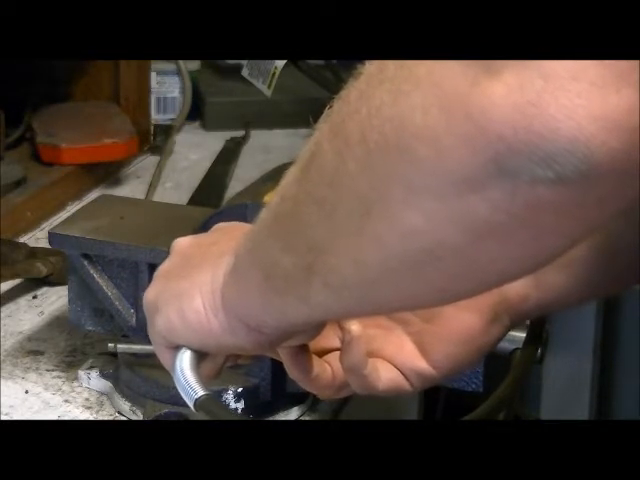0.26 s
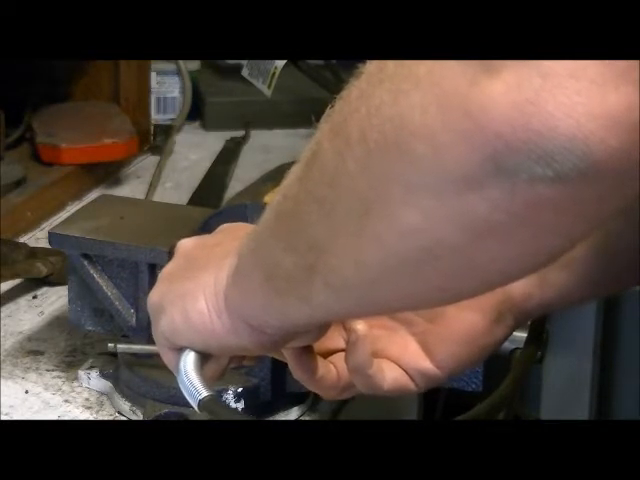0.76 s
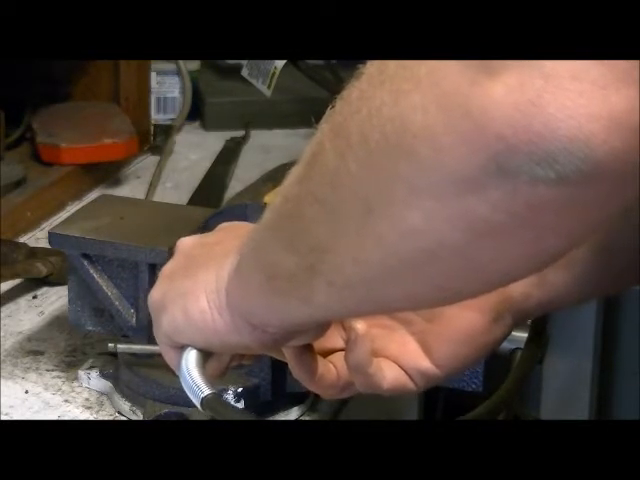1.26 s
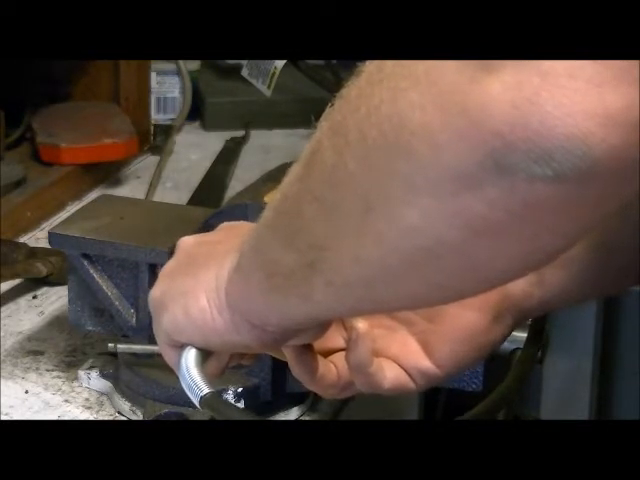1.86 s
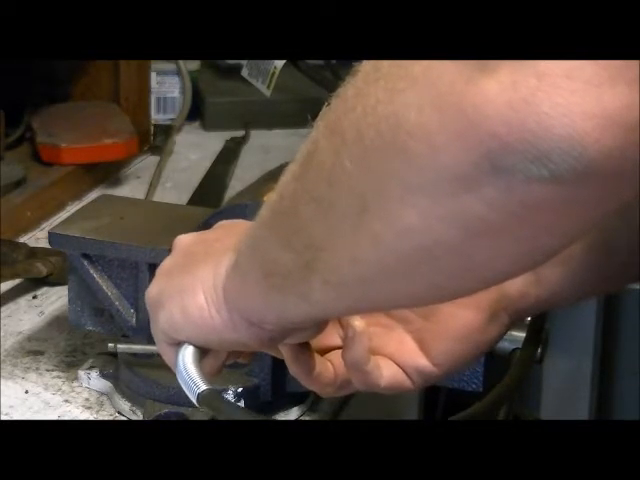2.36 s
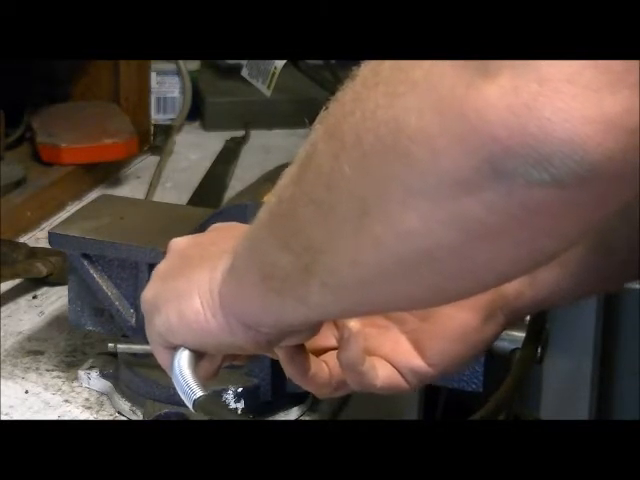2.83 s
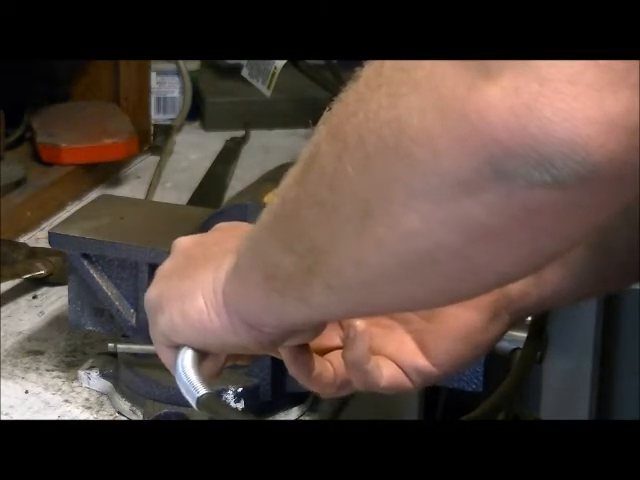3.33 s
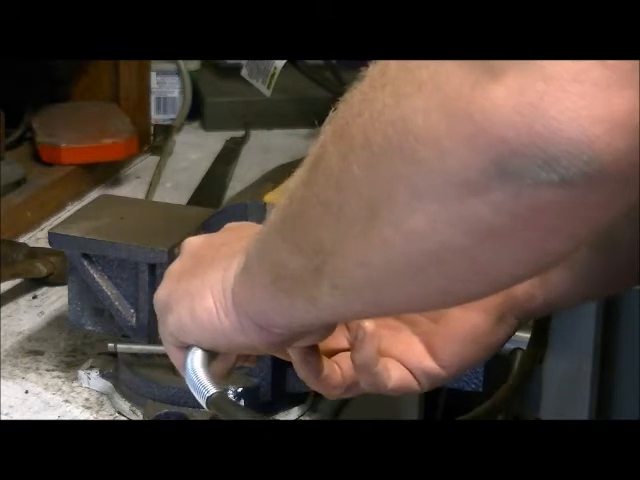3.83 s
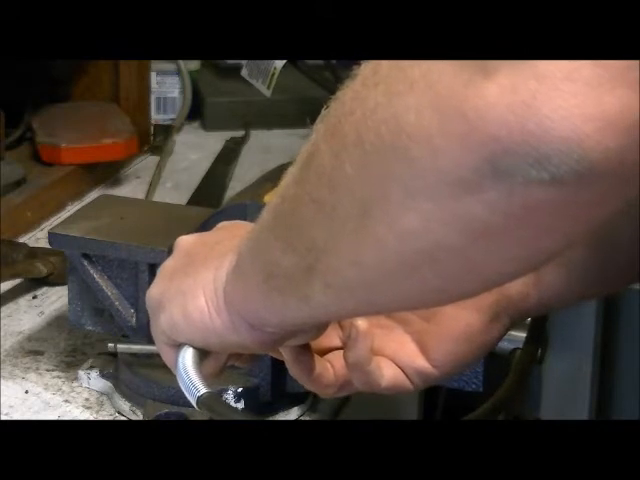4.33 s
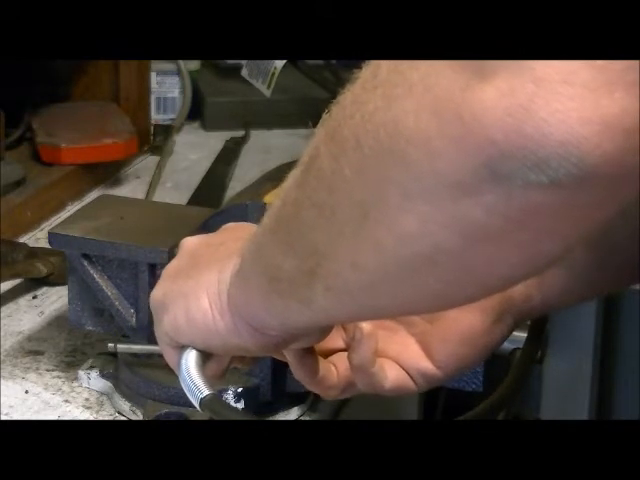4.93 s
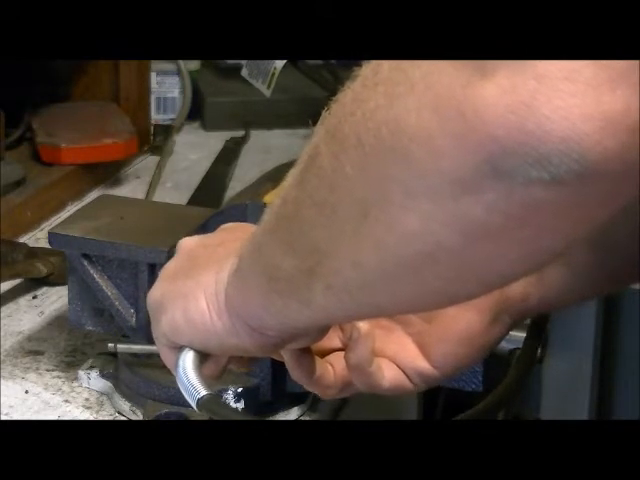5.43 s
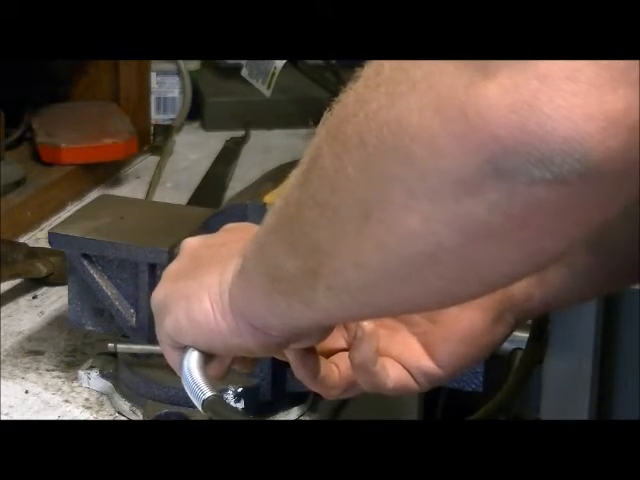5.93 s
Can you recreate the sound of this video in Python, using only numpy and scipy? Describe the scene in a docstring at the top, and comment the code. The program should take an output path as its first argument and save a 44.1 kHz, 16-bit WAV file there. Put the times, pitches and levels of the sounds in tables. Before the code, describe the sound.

Continuous close grinding of steel by a small high-speed tool, scratchy and ringing, with pitch wobbling under load, sagging late, then climbing again.

```python
"""Rotary tool grinding steel

A handheld rotary tool grinds a steel part held in a vice, in a workshop. The burr's teeth are random noise that
rattles the steel into many short rings, over a broad scratch, a low body and a hiss of sparks. At times the bounce
of the burr locks to the shaft and repeats every two or four turns, which draws a buzzing pitch out of the rasp.
The pitch follows a drawn shaft speed, slower under load. Sine waves make the shaft hum; shaped noise makes the
cooling air and a faint rumble; decaying noise adds a tail and a faint side sound for slight stereo width."""
import sys
import numpy as np
from scipy import signal
from scipy.fft import rfft, irfft, next_fast_len
from scipy.io import wavfile
from scipy.ndimage import uniform_filter1d

SR = 44100
rng = np.random.default_rng(int(sys.argv[2]) if len(sys.argv) > 2 else 0)


def wrap_up_sound(samples):
    """Save the sound to the file named by the first command line argument, as 16-bit audio."""
    columns = np.atleast_2d(samples).T
    # keep every value between -1 and 1, then stretch to whole-number steps
    tamed = np.clip(columns, -1, 1)
    steps = np.round(tamed * 32767).astype(np.int16)
    wavfile.write(sys.argv[1], SR, steps)


N = 272979  # length in samples


def from_db(db):
    """Turn decibels into gain."""
    return 10 ** (np.asarray(db) / 20)


def rms_one(x):
    """Scale a sound to an rms level of 1."""
    return x / np.sqrt(np.mean(x ** 2) + 1e-20)


def in_time(rows):
    """Draw each column after the time column as a curve with one value per sample."""
    times, *columns = np.transpose(rows)
    return [np.interp(np.arange(N) / SR, times, column) for column in columns]


def at_hz(points, hz):
    """Read a drawn spectrum, with straight lines on a log-frequency axis."""
    point_hz, point_db = np.array(points)[:, 0], np.array(points)[:, 1]
    return np.interp(np.log(hz + 1), np.log(point_hz), point_db)


def drift(rate_hz):
    """Slow random wandering of spread 1: coarse noise smoothed by two equal one-pole low-passes."""
    step = 40  # samples between coarse points
    pole = np.exp(-2 * np.pi * rate_hz * step / SR)
    noise = rng.standard_normal(N // step + 2002)
    slow = signal.lfilter([1], [1, -2 * pole, pole * pole], noise)[2000:]  # drop the filter's start-up
    return np.interp(np.arange(N) / step, np.arange(len(slow)), rms_one(slow))


def resonance(x, hz, width):
    """A two-pole band that rings at one pitch, with gain 1 at its peak; a narrower band rings longer."""
    r = np.exp(-np.pi * width / SR)
    feed = np.array([1, 0, -1]) * (1 - r * r) / 2
    feedback = [1, -2 * r * np.cos(2 * np.pi * hz / SR), r * r]
    return signal.lfilter(feed, feedback, x)


def coloured(x, spectrum):
    """Shape a sound's frequencies by a drawn spectrum."""
    size = next_fast_len(N + SR // 4)
    hz = np.arange(size // 2 + 1) * SR / size
    return irfft(rfft(x, size) * from_db(at_hz(spectrum, hz)), size)[:N]


def fade_in_and_out(start, end, fade_s):
    """Rise from 0 to 1 and fall back in straight ramps that are halfway at the start and end times."""
    t = np.arange(N) / SR
    return np.clip(np.minimum(t - start, end - t) / fade_s + .5, 0, 1)


def repeating(turns, count, partials=(), size=8192):
    """A fixed pattern of tooth contacts, read by shaft angle, that comes round every `count` turns."""
    bins = np.arange(size // 2 + 1)
    lines = np.exp(2j * np.pi * rng.random(size // 2 + 1)) * (bins < 105 * count)  # below 105 x shaft speed
    for multiple, level_db in partials:
        lines[round(multiple)] *= from_db(level_db)
    pattern = irfft(lines, size) * size / np.sqrt(170 * count)
    return np.interp(turns / count % 1 * size, np.arange(size), pattern)


def locked_share(count):
    """Share of the rattle that repeats every `count` turns: ramps up, holds, ramps down."""
    # spells of locked bounce: (start time [s], end time [s], repeat [turns], share of the rattle's power [0-1])
    locks = [(.47, .74, 2, .6), (1.55, 1.92, 4, .62), (1.98, 2.43, 4, .4), (2.64, 3.03, 4, .35),
             (3.11, 3.3, 4, .55), (3.5, 3.62, 4, .45), (3.97, 4.38, 2, .78), (4.4, 4.68, 2, .87),
             (4.72, 5.03, 2, .72), (5.28, 5.5, 2, .78), (5.86, 6.3, 2, .72)]
    always_share, lock_in_s = .1, .16  # share that always repeats; time to lock or unlock
    share = np.full(N, always_share)
    for start, end, turns, top in locks:
        if turns == count:
            share = np.maximum(share, top * fade_in_and_out(start, end, lock_in_s))
    return share


def teeth(angle, beat_db):
    """Tooth contacts on two paths: the same patterns locked to the shaft, plus fresh noise on each."""
    # partials of the two-turn bounce: (pitch [multiples of half shaft speed], level [dB])
    bounce_partials = [(2, -12), (3, -12), (4, -12), (5, -12), (6, 0), (7, -4), (8, 5), (9, 6), (10, -9),
                       (11, -5), (12, 3), (13, 2), (14, 3), (15, 5), (16, -1), (17, -4), (18, -2), (19, -1),
                       (20, 0), (21, -5), (22, -5), (23, 1), (24, 0), (25, -2), (26, 3), (27, -2), (28, -4),
                       (29, -5), (30, 1)]
    # partials favoured by the four-turn bounce: (pitch [multiples of quarter shaft speed], level [dB])
    quarter_partials = [(16, 4), (17, 4), (18, 3)]
    wander = .5  # strength of the reshaping patterns against the steady one
    firm_below, firm_db = 16, -7  # partials below this multiple reshape less
    two = locked_share(count=2)
    four = np.minimum(locked_share(count=4), 1 - two)

    # as the burr moves over the part the bounce keeps reshaping, so its partials swell and fade
    loose = [(multiple, db + firm_db * (multiple < firm_below)) for multiple, db in bounce_partials]
    steady = repeating(angle, count=2, partials=bounce_partials)
    passing = [repeating(angle, count=2, partials=loose) for _ in range(3)]
    bounce = steady + wander * sum(drift(5) * pattern for pattern in passing) / np.sqrt(3)

    locked_two = np.sqrt(two / (1 + wander ** 2)) * bounce
    locked_four = np.sqrt(four) * repeating(angle, count=4, partials=quarter_partials)
    fresh = np.sqrt(np.clip(1 - two - four, 0, 1)) * rng.standard_normal((2, N))
    force = locked_two + locked_four + fresh
    # the burr runs out of true and presses harder once every other turn
    return force * from_db(beat_db * np.sin(np.pi * angle))


def swelling(ring_hz):
    """Drive of one strong ring in dB: a rest level with a rounded hump or dip for each swell."""
    # rings swell as the burr wanders over the part:
    # (peak time [s], ring pitch [Hz], rise or fall [dB], half length [s])
    swells = [(0.0, 5750, 8, 0.054), (0.183, 2380, 8, 0.089), (0.16, 1110, 3, 0.052), (0.28, 5750, 5, 0.17),
              (0.483, 2380, 8.5, 0.16), (0.577, 5750, 5.5, 0.087), (0.745, 2380, 7.5, 0.1),
              (0.883, 5750, 4, 0.13), (1.063, 2380, 4.5, 0.095), (1.41, 5750, 2.5, 0.14),
              (1.55, 1110, 3.5, 0.2), (1.778, 1110, 10.5, 0.082), (1.727, 7365, 2, 0.15),
              (1.883, 2380, 8.5, 0.063), (2.286, 7365, 7, 0.078), (2.541, 5750, 2, 0.066),
              (2.534, 1110, -0.5, 0.089), (2.566, 7365, 3, 0.11), (2.693, 2380, 4.5, 0.099),
              (2.853, 7365, 3, .1), (2.998, 2380, 5, 0.11), (3.058, 1110, 6.5, 0.15),
              (3.09, 5750, 4, 0.083), (3.1, 7365, 3.5, 0.45), (4.12, 2380, 6, 0.31),
              (4.278, 5750, 8.5, 0.092), (4.28, 7365, 9, 0.098), (4.454, 5750, 7, 0.14),
              (4.494, 1110, 4, 0.29), (4.86, 1110, 4, 0.13), (4.944, 5750, 5, 0.18), (4.997, 7365, 6, 0.28),
              (5.224, 2380, 3, 0.51), (5.463, 5750, -0.5, 0.25), (5.956, 2380, 4, 0.066),
              (.4, 3190, -2.5, 0.65), (4.17, 3190, 9, 0.14), (4.853, 3190, 8, 0.86), (5.598, 3190, 8, 0.64),
              (4.292, 1110, 3.5, 0.093), (4.421, 2380, -11.5, 0.49), (0.51, 4780, 6.5, 0.47),
              (4.31, 4780, 9, 0.15), (4.593, 4780, 8, 0.14), (5.302, 4780, 4, 0.22)]
    coupling_db = -1.5  # between swells
    t = np.arange(N) / SR
    for peak, near_hz, rise_db, half in swells:
        if abs(near_hz / ring_hz - 1) < .06:
            hump = np.cos(np.pi / 2 * np.clip((t - peak) / half, -1, 1)) ** 2
            coupling_db = coupling_db + rise_db * hump
    return coupling_db


def steel(force, flicker_db):
    """Part and vice ring in many modes, each driven with a wavering force; strong rings follow their swells."""
    # modes of part and vice: (pitch [Hz], width [Hz], relative level [dB])
    modes = [(650, 60, -28), (1055, 20, -16), (1103, 22, -9.5), (1160, 40, -15), (1341, 30, -18),
             (1540, 25, -18), (1610, 30, -17), (1789, 55, -8.5), (1850, 60, -10), (1925, 45, -9),
             (2345, 25, 0), (2400, 35, -2), (2440, 30, -1), (2670, 50, -10), (2790, 30, -6), (2840, 30, -5),
             (2890, 25, -7), (3105, 35, -9), (3268, 30, -8), (3435, 20, -8), (3470, 22, -5),
             (3610, 80, -8.5), (3845, 35, -9), (4110, 35, -6), (4228, 25, -3), (4320, 40, 0),
             (4400, 30, -3), (4446, 30, -3), (4515, 35, -4.5), (4580, 45, -5), (4778, 35, 0.5),
             (5027, 35, -7), (5082, 30, -9), (5560, 30, -10), (5632, 22, -4), (5755, 45, 2.5),
             (5845, 40, -4), (6005, 40, -14), (7292, 30, -10), (7370, 30, -7), (8630, 90, -15),
             (8860, 100, -16), (9250, 50, -17), (9570, 50, -16), (11700, 160, -31), (13700, 110, -25)]
    # strong rings: (pitch [Hz])
    strong_hz = [1110, 2380, 3190, 4780, 5750, 7365]
    modes_db = 4  # lift of all modes over the scratch
    ringing = np.zeros(N)
    for k, (mode_hz, width, level_db) in enumerate(modes):
        coupling_db = modes_db + level_db + flicker_db * drift(10)
        for ring_hz in strong_hz:
            if abs(mode_hz - ring_hz) < 110:
                coupling_db = modes_db + level_db + swelling(ring_hz)
        # every other mode is flipped in sign
        ringing += (-1) ** k * resonance(force * from_db(coupling_db), mode_hz, width)
    return ringing


def rasp(force, patchy_db):
    """The broad scratch of the teeth between the modes, flickering in quarter-octave patches."""
    # colour of the scratch: (frequency [Hz], relative level per Hz [dB])
    scratch_colour = [(170, -53), (400, -31), (900, -26), (1450, -15.5), (2100, -7.5), (2600, -10.5),
                      (4000, -8), (5300, -11), (6300, -19.5), (8900, -18), (10500, -28), (12700, -27),
                      (14200, -41), (15500, -40)]
    size = next_fast_len(N + SR // 4)
    octave = np.log2(np.arange(size // 2 + 1) * SR / size + 1)
    whole = rfft(coloured(force, scratch_colour), size)
    scratch = np.zeros(N)
    for centre in np.arange(7, 14.3, .25):  # in octaves above 1 Hz
        patch = irfft(whole * np.clip(1 - 4 * abs(octave - centre), 0, 1), size)[:N]
        scratch += patch * from_db(patchy_db * drift(12))
    return scratch


def decaying_tail(x, t60=.18):
    """One decaying noise tail of unit energy: a crowd of modes too dense to list; t60 [s] is its 60 dB decay."""
    t = np.arange(SR // 2) / SR
    tail = rng.standard_normal(len(t)) * from_db(-60 * t / t60) * (t > .002)
    return signal.fftconvolve(x, tail / np.sqrt(np.sum(tail ** 2)))[:N]


def grinding(turns):
    """Tooth contacts shake the steel; pressure on the work sets the levels of rattle, low body and spark hiss."""
    # the cut, before bass cut and tail: (time [s], rattle level [dB], low body level [dB], spark hiss level [dB])
    cut = [(0.0, -21, -41.5, -33), (0.12, -24, -44.5, -32), (0.93, -22.5, -41, -32),
           (1.64, -22, -40.5, -31), (2.3, -22, -39, -32), (3.9, -22.5, -41.5, -31),
           (4.25, -23, -49.5, -34.5), (4.55, -21.5, -44, -32.5), (4.86, -22, -44.5, -32.5),
           (5.59, -23, -42, -34), (6.19, -21.5, -42, -30.5)]
    # pitches at which the part radiates little: (pitch [Hz], width [Hz], depth [0-1])
    hollows = [(1460, 51, 0.64), (2575, 94, 0.58), (3760, 117, 0.37), (3930, 110, 0.48), (7170, 200, 0.56),
               (8970, 180, 0.55)]
    low_edge_hz, high_edge_hz = 1600, 6500
    rattle_waver_db, low_waver_db, hiss_waver_db = .5, 1.56, .86
    vice_db, vice_t60_s = -8, .06
    rattle_db, low_db, hiss_db = in_time(cut)

    angle = turns + .005 * drift(40)  # a slight angle slip, in turns, blurs the high partials
    ringing, scratching = teeth(angle, beat_db=1.5)
    sound = steel(ringing, flicker_db=2.2) + rasp(scratching, patchy_db=1.1)
    for hollow_hz, width, depth in hollows:
        sound = sound - np.clip(depth, 0, 1) * resonance(sound, hollow_hz, width)

    # split into three bands and set each level by itself
    low = signal.sosfiltfilt(signal.butter(3, low_edge_hz, fs=SR, output="sos"), sound)
    hiss = signal.sosfiltfilt(signal.butter(3, high_edge_hz, "high", fs=SR, output="sos"), sound)
    rattle = rms_one(sound - low - hiss) * from_db(rattle_db + rattle_waver_db * drift(7.7))
    hiss = hiss + from_db(vice_db) * decaying_tail(hiss, vice_t60_s)  # the vice's many small treble modes
    low = rms_one(low) * from_db(low_db + low_waver_db * drift(8))
    hiss = rms_one(hiss) * from_db(hiss_db + hiss_waver_db * drift(10))
    return rattle + low + hiss


def fan():
    """Cooling air through the motor housing: shaped noise that slowly swells and fades."""
    # colour of the air: (frequency [Hz], relative level per Hz [dB])
    air_colour = [(150, -11), (300, -21), (600, 16), (1000, 7), (1600, -10), (3000, -29)]
    level_db = -69 + 3.2 * drift(1.0)  # before the bass cut
    return from_db(level_db) * rms_one(coloured(rng.standard_normal(N), air_colour))


def hum(turns, speed):
    """Unbalance shakes the tool at shaft speed; the bounce adds wavering fractions of it, some clear for a spell."""
    # faint hum: (pitch [multiples of shaft speed], relative level [dB])
    orders = [(1, 0), (1.25, -16), (1.5, -14), (1.75, -10), (2, -3), (2.25, -6), (2.5, -2)]
    # spells in which one tone sings out: (start time [s], end time [s], pitch [multiples of shaft speed], level [dB])
    spells = [(0.098, .42, 1.5, -70.5), (.2, .42, 2.5, -63), (0.052, .3, 3, -63), (.47, .82, 2, -63.5),
              (0.503, .72, 2.5, -56), (1.052, 1.351, 2.5, -58), (1.18, 1.5, 1.25, -67.5),
              (1.4, 1.594, 2.5, -58), (1.58, 1.95, 2, -68), (1.627, 1.98, 2.25, -74),
              (1.98, 2.5, 1.75, -71), (2.007, 2.16, 2, -69), (2.02, 2.578, 2.5, -64), (2.3, 2.55, 2, -67),
              (2.6, 3.026, 2, -65.5), (2.6, 2.95, 2.5, -58), (2.72, 2.943, 1.25, -72),
              (3.05, 3.5, 2.5, -57), (3.14, 3.447, 2, -60.5), (3.199, 3.499, 1.75, -72),
              (3.52, 3.721, 2, -64), (3.7, 3.867, 1.75, -65), (3.679, 3.967, 2.5, -62),
              (3.95, 4.36, 1.5, -69), (3.952, 4.36, 2, -69), (4.38, 4.927, 2.5, -60.5), (4.4, 4.66, 2, -70),
              (4.679, 5.051, 1.5, -68), (4.68, 5.027, 2, -61.5), (5.12, 5.577, 2.5, -64),
              (5.3, 5.5, 3.5, -66), (5.302, 5.55, 1, -86), (5.882, 6.1, 2.5, -61), (5.93, 6.3, 2, -64),
              (5.95, 6.302, 1.5, -72)]
    full_db, full_hz, fall_db_per_octave = -71, 252, 50  # faint hum fades as the shaft slows below full speed
    slip_turns, spell_fade_s = .035, .06  # the slip is in turns of each tone's own cycle
    level_db = full_db + fall_db_per_octave * np.minimum(np.log2(speed / full_hz), 0)

    def tone(multiple):
        """A sine wave that follows the shaft, with a wandering phase."""
        return np.sin(2 * np.pi * (multiple * turns + slip_turns * drift(15)))

    tones = np.zeros(N)
    for multiple, db in orders:
        waver_db = 4.0 if multiple == 1 else 5.0
        tones += from_db(level_db + db + waver_db * drift(5)) * tone(multiple)
    for start, end, multiple, db in spells:
        fade = fade_in_and_out(start, end, spell_fade_s)
        tones += from_db(db + 3.0 * drift(10)) * fade * tone(multiple)
    return tones * np.sqrt(2)  # so the levels are rms levels


def rumble():
    """Faint lumpy low noise: a part shared by both microphone ports, plus some of each port's own."""
    shared, left, right = rng.standard_normal((3, N))
    lumps = from_db(-101 + 9.0 * drift(6))
    band = signal.butter(2, [30, 140], "band", fs=SR, output="sos")
    low_noise = signal.sosfilt(band, shared + .5 * np.array([left, right]))
    return lumps * rms_one(low_noise)


def scene():
    """The tool near the middle, with a decaying noise tail, and a faint side noise for slight stereo width."""
    # shaft speed: (time [s], speed [turns per s])
    shaft = [(0.0, 205.5), (0.2, 224.4), (0.33, 221.6), (0.5, 252), (0.66, 256.4), (0.88, 235.8),
             (1.0, 249.7), (1.14, 250), (1.3, 275), (1.45, 250.2), (1.57, 279.8), (1.89, 274.1),
             (2.02, 249.9), (2.2, 255.6), (2.57, 245.6), (2.68, 264.6), (2.84, 256.4), (3.0, 282.3),
             (3.13, 248), (3.3, 257.5), (3.44, 248.3), (3.57, 275.8), (3.67, 257.5), (3.89, 271.8),
             (3.94, 255.6), (4.01, 249.6), (4.18, 243.9), (4.27, 234.6), (4.33, 235.4), (4.43, 257.1),
             (4.52, 263.2), (4.57, 261), (4.665, 257.8), (4.795, 244.7), (4.91, 254.6), (5.01, 239.5),
             (5.1, 217.1), (5.23, 176.1), (5.31, 180.9), (5.41, 190), (5.5, 179.6), (5.6, 166.3),
             (5.71, 183.5), (5.84, 236.6), (5.93, 250.4), (6.19, 259.8)]
    # stereo width: (frequency [Hz], level of the faint side sound against the tool [dB])
    width = [(60, -40), (200, -22), (300, -39), (400, -41), (600, -22), (1000, -30), (2000, -22),
             (4000, -24.5), (8000, -17), (13000, -19), (15000, -30)]
    inertia_s, tail_db = .04, -14  # the rotor rounds off sudden changes of speed; level of the tail
    speed = uniform_filter1d(in_time(shaft)[0], int(inertia_s * SR), mode="nearest")
    turns = np.cumsum(speed) / SR

    # steep bass cut of the microphone; the hum's levels are set after it
    bass_cut = signal.butter(4, 220, "high", fs=SR, output="sos")
    tool = signal.sosfilt(bass_cut, grinding(turns) + fan()) + hum(turns, speed)
    mid = tool + from_db(tail_db) * decaying_tail(tool)
    side = coloured(decaying_tail(tool), width)
    balance = from_db([[-.05], [.05]])  # left a touch softer, right a touch stronger
    return np.array([mid + side, mid - side]) * balance + rumble()


def record(dry):
    """A steep low-pass cuts off the top of the treble."""
    cutoff_hz = 15690
    return signal.sosfilt(signal.ellip(14, .5, 80, cutoff_hz, fs=SR, output="sos"), dry)


dry = scene()
out = record(dry)
wrap_up_sound(out)
```